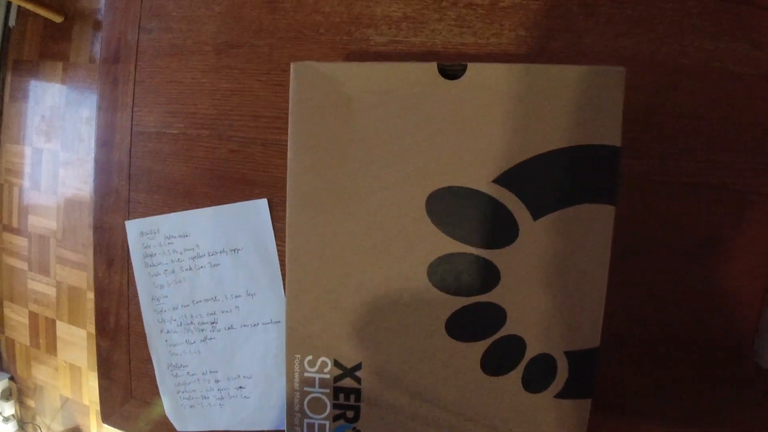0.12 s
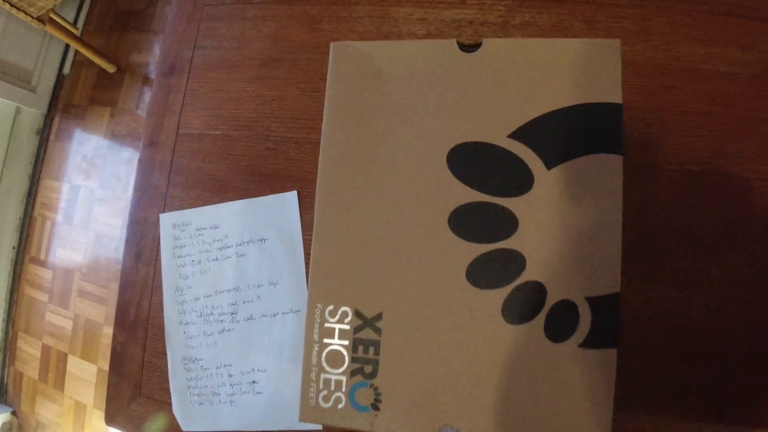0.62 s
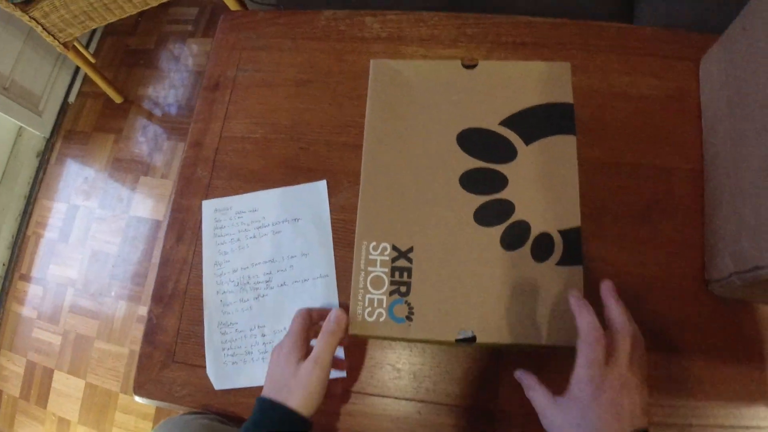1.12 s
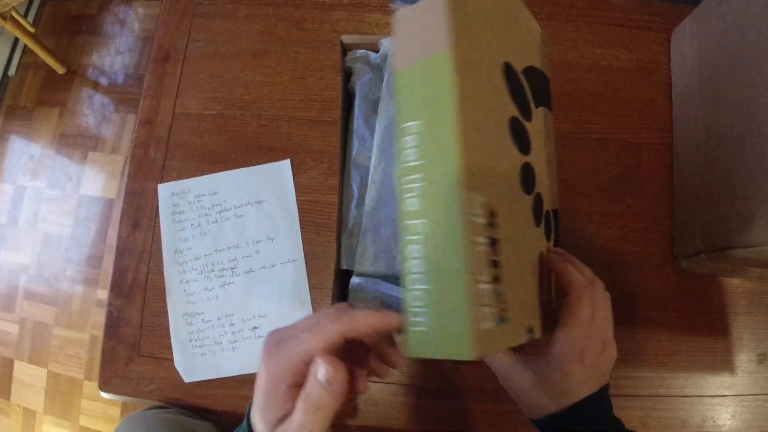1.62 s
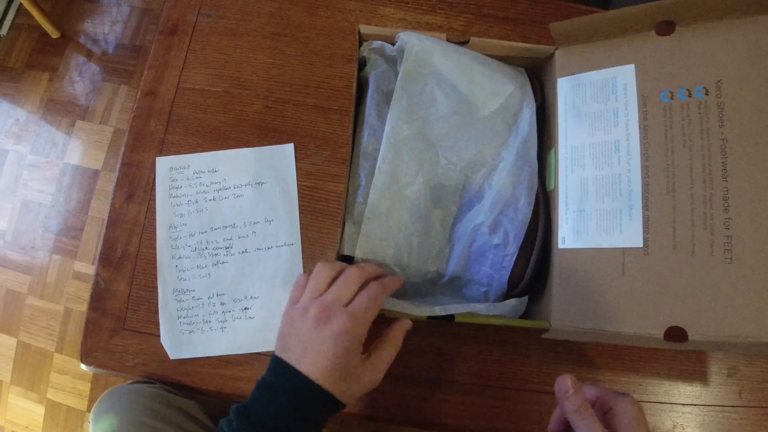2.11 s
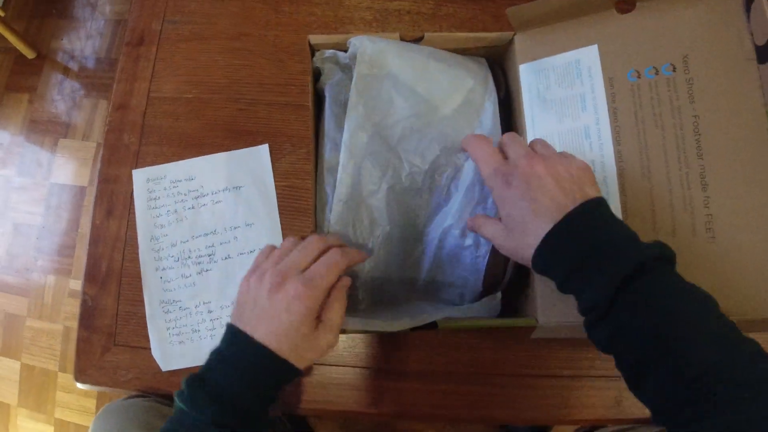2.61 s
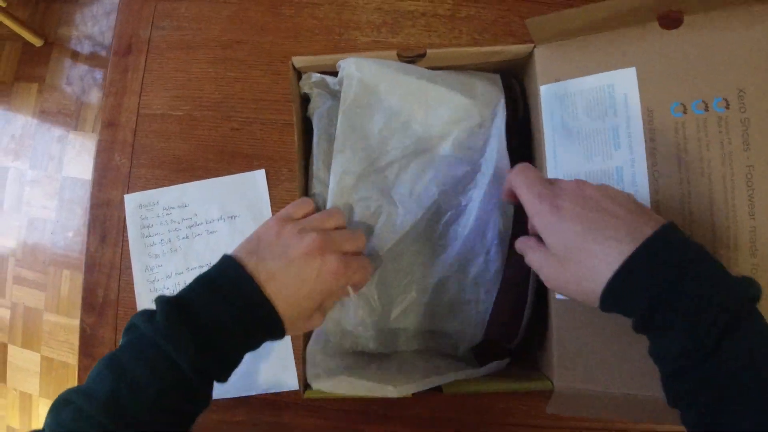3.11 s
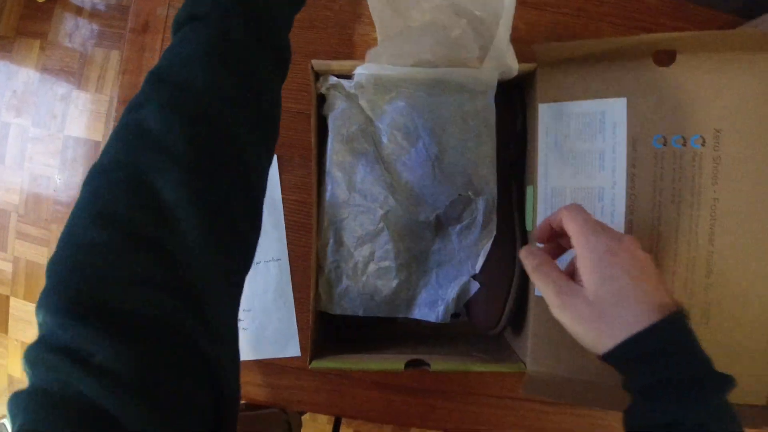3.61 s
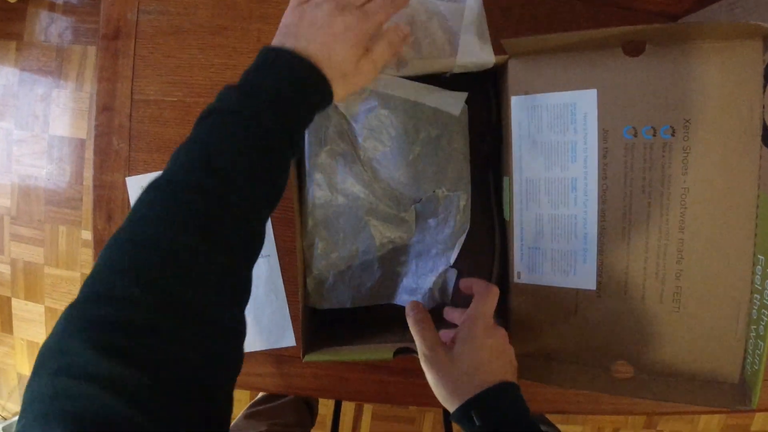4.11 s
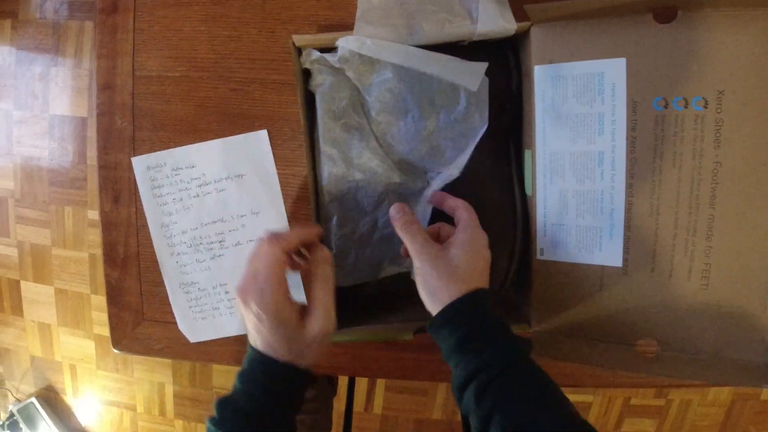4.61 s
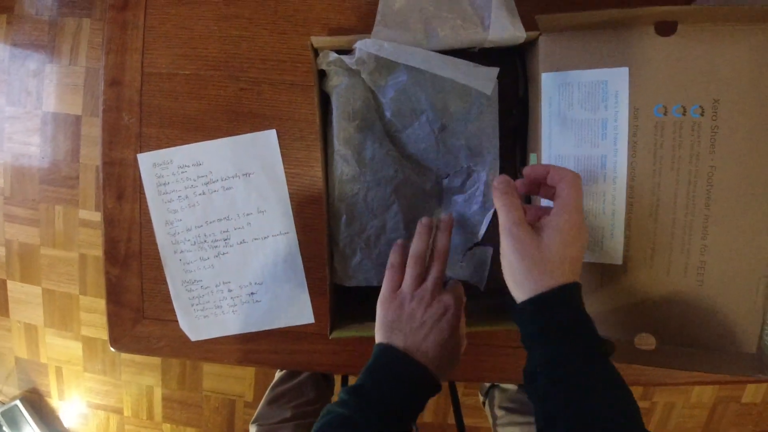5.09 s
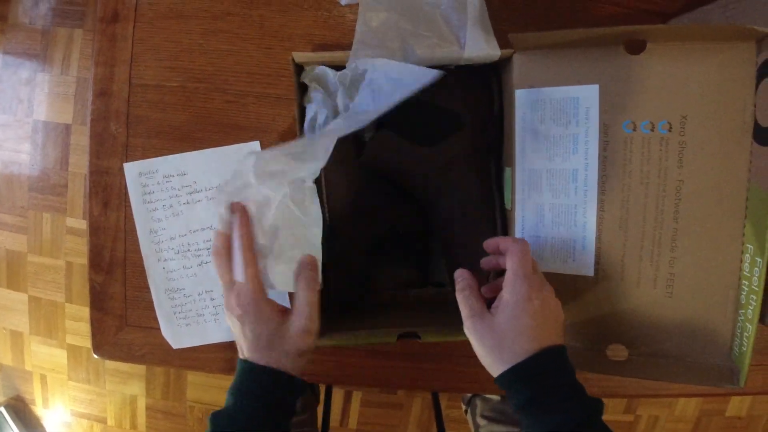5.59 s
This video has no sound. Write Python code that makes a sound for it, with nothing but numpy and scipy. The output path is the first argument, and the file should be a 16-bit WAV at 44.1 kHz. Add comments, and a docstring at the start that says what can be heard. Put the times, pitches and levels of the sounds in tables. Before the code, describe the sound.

A small tap and soft sleeve shuffle, knocks of a cardboard box being opened, then close, bright crinkling of thin wrapping tissue.

```python
"""A quiet room, a small hard tap with a scratchy tail and shuffling sleeves; then a cardboard shoebox on a wooden
table is gripped, its lid pops free, swings over and drops on the table, all as struck modes, rubs and twangs.
Then hands pull back sheets of tissue paper: band noise shaped by grains, with ringing snaps and air pressure dips.
Two close microphone ports hear the bass alike and the treble differently."""
import sys
import numpy as np
from scipy import signal
from scipy.fft import rfft, irfft, next_fast_len
from scipy.io import wavfile

SR = 44100
rng = np.random.default_rng(int(sys.argv[2]) if len(sys.argv) > 2 else 0)


def dump(signal):
    """Clip the signal to [-1, 1] and save it as 16-bit WAV at the path in sys.argv[1]."""
    limited = np.clip(np.atleast_2d(signal).T, -1, 1)
    pcm = np.round(limited * 32767).astype(np.int16)
    wavfile.write(sys.argv[1], SR, pcm)


def natural_amplitude(level_db):
    """Convert a level in decibels to a linear amplitude factor, elementwise."""
    exponent = np.asarray(level_db, float) / 20
    return 10 ** exponent


N = 252249
HZ = np.maximum(np.fft.rfftfreq(next_fast_len(N + SR), 1 / SR), 1)

# Four pulls at the tissue. Each row: time in seconds, crinkle level in dB, sheet flapping level in dB.
TISSUE = [
    [(2.28, -74, -42.5), (2.3, -54.5, -56), (2.322, -65, -52), (2.352, -63.5, -61), (2.384, -56.5, -50),
     (2.46, -57, -50), (2.478, -58.5, -49), (2.64, -65, -60.5), (2.68, -82, -68), (2.686, -83, -83),
     (2.72, -84, -73)],
    [(2.87, -79, -49), (2.888, -60.5, -53), (2.914, -54.5, -54.5), (2.972, -51, -46.5),
     (3.086, -43.5, -45.5), (3.126, -46, -41), (3.162, -49, -53), (3.194, -52, -46), (3.214, -50.5, -48),
     (3.242, -44.5, -44.5), (3.308, -48.5, -46), (3.414, -53.5, -55), (3.424, -51, -48),
     (3.468, -54.5, -45), (3.502, -51, -52), (3.528, -56.5, -47), (3.542, -51, -42.5), (3.624, -42, -45),
     (3.642, -49.5, -46.5), (3.694, -55, -63), (3.71, -50.5, -51), (3.79, -64.5, -72), (3.82, -65.5, -56)],
    [(4.0, -76, -51), (4.03, -44.5, -44), (4.052, -55, -49), (4.066, -48, -45), (4.092, -51, -52),
     (4.12, -49, -42), (4.138, -57, -49), (4.212, -47, -50), (4.288, -56, -48.5), (4.35, -57.5, -53.5),
     (4.454, -56, -53.5), (4.48, -59, -52), (4.524, -50, -59), (4.626, -59.5, -54), (4.704, -49.5, -56),
     (4.72, -48.5, -48), (4.764, -59, -52.5), (4.86, -73, -66.5), (4.88, -77, -69.5)],
    [(5.31, -98, -61.5), (5.34, -63.5, -62.5), (5.374, -50, -51), (5.394, -45.5, -51), (5.408, -53, -57),
     (5.428, -47, -44), (5.44, -45, -48), (5.53, -48, -49.5), (5.578, -47, -41.5), (5.67, -51, -50),
     (5.72, -47, -41.5)],
]
# Tone colour of tissue paper. Each row: frequency in Hz, weight in dB per Hz.
PAPER = [(47, -5), (80, -8.5), (269, -2), (866, -7.5), (1640, -7), (1790, -6), (2440, -8), (3040, -5),
         (3600, -10), (4250, -9), (6160, -11.5), (7190, -21), (8770, -11.5), (11900, -21.5), (13300, -17.5),
         (15600, -20)]


def rms_one(x):
    """Scale to unit rms."""
    return x / np.sqrt(np.mean(x ** 2) + 1e-20)


def in_time(rows):
    """Columns of a dB curve, sample by sample; it fades in from silence over 15 ms."""
    silent_start = [rows[0][0] - .015] + [-100] * (len(rows[0]) - 1)
    s, *columns = np.transpose([silent_start, *rows])
    return [np.interp(np.arange(N) / SR, s, c, left=-150, right=-150) for c in columns]


def strokes(rows, rise_db_per_s, fall_db_per_s):
    """Each stroke rises fast, holds and dies away; strokes add in power. One dB curve per range."""
    t = np.arange(N) / SR
    power = 1e-15
    for s, held, *peak_db in rows:
        rise_loss = rise_db_per_s * np.maximum(s - t, 0)
        fall_loss = np.outer(fall_db_per_s, np.maximum(t - s - held, 0))
        level_db = np.array(peak_db)[:, None] - rise_loss - fall_loss
        power = power + natural_amplitude(2 * np.maximum(level_db, -150))
    return 10 * np.log10(power)


def colour(x, points):
    """Weight the spectrum by (Hz, dB) points."""
    hz, db = np.transpose(points)
    gain = natural_amplitude(np.interp(np.log(HZ), np.log(np.maximum(hz, 1)), db))
    return irfft(rfft(x, 2 * len(HZ) - 2) * gain)[..., :N]


def band(x, low_hz, high_hz):
    """Band-pass with steep sides."""
    return signal.sosfilt(signal.butter(3, [low_hz, high_hz], "band", fs=SR, output="sos"), x)


def ring(clicks, hz, t60):
    """A two-pole resonator: a unit click sets a sine ringing from about height 1."""
    r, w = 1000 ** (-1 / (t60 * SR)), 2 * np.pi * hz / SR
    return signal.lfilter([0, np.sin(w)], [1, -2 * r * np.cos(w), r * r], clicks + 1e-18)


def uneven_sizes(spread_db, shape=N):
    """Sizes of tiny creases: mostly small, now and then far larger."""
    return natural_amplitude(spread_db * np.minimum(rng.exponential(1, shape), 4))


def decaying(sizes, decay_s):
    """Each impulse becomes a sudden start with an exponential decay."""
    return signal.lfilter([1], [1, -np.exp(-1 / (decay_s * SR))], sizes)


def grains(per_s, spread_db, decay_s, bed):
    """Envelope of countless tiny creases: sudden starts, decays, uneven sizes, over a smooth bed."""
    sizes = uneven_sizes(spread_db) * (rng.random(N) < per_s / SR)
    return bed + rms_one(decaying(sizes, decay_s))


def friction(levels_db, spectrum, shared, own_per_s, own_spread_db):
    """Grains excite three ranges of a sheet, low to high; mid and side get unrelated fine detail."""
    out = np.zeros((2, N))
    for level_db, (low, high) in zip(levels_db, [(100, 700), (700, 5500), (5500, 15700)]):
        edges = np.geomspace(low, high, 4)
        layer = 0
        for lower, upper in zip(edges, edges[1:]):
            # each patch of the sheet creases on its own; big patches ring longer
            envelope = shared * grains(own_per_s, own_spread_db, 44.0 / lower, bed=0.56)
            layer = layer + band(rms_one(envelope) * rng.standard_normal((2, N)), lower, upper)
        out += natural_amplitude(level_db) * rms_one(colour(layer, spectrum))
    return out


def pulls():
    """Flap, crinkle and fizz levels of the tissue in dB; in a pull the fizz follows the crinkle."""
    # Tissue settling or merely touched, soft and with little fizz. Each row: start in seconds,
    # hold in seconds, flapping level in dB, crinkle level in dB, fizz level in dB.
    settle = [(2.752, 0.024, -63, -81, -100), (2.787, 0.043, -58, -65.5, -109),
              (3.825, 0.0073, -62, -64, -73), (3.884, 0.012, -54, -61, -99), (3.93, 0.091, -59, -65, -91),
              (4.88, 0.02, -68, -68, -93), (4.95, 0.087, -67, -76, -94), (5.17, 0.0064, -71, -75.5, -91),
              (5.24, 0.06, -71, -73, -105)]
    fizz_db, fizz_per_db, usual_crinkle_db = -46.5, 1.29, -47.5  # harder pulls are brighter
    crinkle_db, flap_db = np.max([in_time(rows) for rows in TISSUE], axis=0)
    pulled = [flap_db, crinkle_db, fizz_db + fizz_per_db * (crinkle_db - usual_crinkle_db)]
    return np.maximum(pulled, strokes(settle, rise_db_per_s=598, fall_db_per_s=[97, 135, 210]))


def pings(per_s, spread_db, cycles):
    """Small taut patches of tissue ring at scattered pitches; the side hears them with random signs."""
    sizes = uneven_sizes(spread_db) * (rng.random(N) < per_s / SR)
    pitches, dealt = np.geomspace(700, 5000, 22), rng.integers(0, 22, N)
    clicks = sizes * np.array([np.ones(N), rng.choice([-1, 1], N)])
    rings = 0
    for k, hz in enumerate(pitches):
        t60 = cycles / hz
        rings = rings + ring(clicks * (dealt == k), hz, t60) / np.sqrt(t60)
    return rms_one(colour(rings, PAPER))


def rasp():
    """Very dense tiny clicks ring in five close resonances; which one leads shifts as the sheet folds."""
    clicks_per_s, middle_hz, cycles = 3000, 3200, 12
    sizes = uneven_sizes(3.0, (2, N)) * rng.choice([-1, 1], (2, N))
    clicks = sizes * (rng.random((2, N)) < clicks_per_s / SR)
    folds = np.interp(np.arange(N), np.linspace(0, N, 150), rng.uniform(-1, 1, 150))
    rings = 0
    for place in np.linspace(-1, 1, 5):
        lead = np.exp(-(folds - place) ** 2 / 0.33)
        rings = rings + ring(clicks * lead, middle_hz * 1.19 ** place, cycles / middle_hz)
    return rms_one(band(rings, 1920, 4600))


def crackles(per_s, spread_db, decay_s):
    """Single creases tick: a sudden spurt of noise, gone in a millisecond or two, in clumps."""
    clumps = np.repeat(rng.exponential(1, N // 800 + 1), 800)[:N]
    sizes = uneven_sizes(spread_db) * (rng.random(N) < clumps * per_s / SR)
    spurts = decaying(sizes, decay_s) * rng.standard_normal((2, N))
    return rms_one(colour(band(spurts, 1500, 14700), PAPER))


def tissue_paper(flap_db, crinkle_db, fizz_db):
    """Pulled tissue: friction in three ranges, with pings and rasp on the crinkle and crackles on the fizz."""
    shared = grains(550, 2.0, 0.041, bed=0.97)
    paper = friction([flap_db, crinkle_db, fizz_db], PAPER, shared, own_per_s=360, own_spread_db=0.93)
    paper = paper + natural_amplitude(crinkle_db + 2.6) * pings(per_s=1000, spread_db=0.45, cycles=110)
    paper = paper + natural_amplitude(crinkle_db + 0.5) * rasp()
    return paper + natural_amplitude(fizz_db + 2) * crackles(per_s=800, spread_db=3.6, decay_s=0.00034)


def lesser(level_db, over_db, middle, count):
    """Chance events under a level curve: (s, level dB, size scattered about a middle)."""
    when, loud, size = rng.random((count, 3)).T
    first_s = TISSUE[0][0][0]
    s = first_s + when * ((N - 1) / SR - first_s)
    events_db = level_db[(s * SR).astype(int)] + over_db - 1.9 * loud
    return list(zip(s, events_db, middle * 2 ** (1.4 * (size - .5))))


def snaps(crinkle_db):
    """A crease gives way: a ragged burst that rings a few cycles at the pitch of its patch."""
    # The loudest creases of card and tissue. Each row: start in seconds, level in dB (the peak lies 5 dB
    # lower), ring pitch in Hz.
    loudest = [(1.5333, -40, 2340), (1.555, -33, 2770), (1.5625, -31, 3860), (1.853, -54, 2860),
               (2.2935, -38.5, 3640), (4.155, -30, 2960), (4.3979, -34, 3320), (4.4987, -37, 3080),
               (4.5745, -30, 2880), (4.9327, -48, 2870), (4.9811, -56, 3100), (5.022, -57, 2000),
               (5.1737, -55, 3250), (5.2385, -52, 3370), (5.26, -52, 3320), (5.3118, -49, 3100),
               (5.3737, -32, 3520), (5.478, -25, 2600), (2.3824, -39, 2980), (2.8836, -38, 3480),
               (2.8946, -47, 3250), (2.9112, -37, 2890), (2.9367, -29.5, 2850), (3.0013, -42, 2780),
               (3.0343, -26.5, 1470), (3.046, -31, 3200), (3.0878, -19, 3540), (3.092, -24, 3520),
               (3.108, -18.5, 3100), (3.1262, -21, 3110), (3.1552, -27.5, 3320), (3.215, -28, 2780),
               (3.234, -24, 3330), (3.238, -24, 1500), (3.3941, -27, 2690), (3.452, -23.5, 2620),
               (3.5622, -29.5, 3180), (3.62, -29, 2860), (3.884, -44, 3200), (3.921, -35, 2170),
               (3.94, -35, 2010), (3.955, -41, 1900), (3.985, -40, 1800), (3.33, -27.5, 1560),
               (3.5387, -34, 2830), (3.6051, -28, 2950), (3.7282, -30, 4580), (3.8642, -37, 3070),
               (4.0201, -27, 3130), (4.062, -28.5, 2830), (4.182, -27.5, 2170), (4.2146, -22.5, 3200),
               (4.4461, -27.5, 3630), (4.6731, -34.5, 3500), (4.7915, -35, 2110), (5.356, -30.5, 3730),
               (5.3925, -25.5, 3340), (5.4404, -20, 3280), (5.5567, -24, 2920), (5.6893, -28, 1180)]
    rows = [*loudest, *lesser(crinkle_db, over_db=17, middle=3100, count=200)]
    rise_s, decay_s = .001, .004
    out, t = np.zeros(N + SR), np.arange(SR // 20) / SR
    for (s, level_db, hz), noise in zip(rows, rng.standard_normal((len(rows), len(t)))):
        burst = noise * (1 - np.exp(-t / rise_s)) * np.exp(-t / decay_s)
        snap = ring(burst, hz, 16 / hz) + band(burst, hz / 3, min(1.24 * hz, 15000))
        out[round(s * SR):][:len(t)] += natural_amplitude(level_db - 5.0) * snap / np.abs(snap).max()
    return out[:N]


def buckles(flap_db):
    """A buckling sheet sucks air: a short dip in pressure between two shallow rises."""
    # The sheet buckling hard. Each row: middle of the dip in seconds, level in dB (the dip is 2 dB deeper),
    # width scale in ms (the dip itself is 1.14 times as wide).
    hardest = [(2.9826, -36, 2.4), (3.1144, -33.5, 3.2), (3.1243, -25.5, 1.8), (3.1361, -29, 1.9),
               (3.1702, -34, 2.2), (3.1963, -32, 2.1), (3.2491, -31, 1.26), (3.2864, -29, 1.3),
               (3.3122, -26, 1.16), (3.3394, -28, 1.37), (3.4559, -34, 2.2), (3.4662, -27.5, 1.35),
               (3.479, -33.5, 2.6), (3.5426, -33, 1.25), (3.5776, -32, 1.03), (3.9005, -38, 3.3),
               (4.0334, -30, 0.53), (4.1304, -37, 0.54), (4.2088, -37.5, 2.1), (4.2469, -33.5, 0.39),
               (5.4458, -36, 0.61), (5.6196, -29.5, 0.44)]
    rows = [*hardest, *lesser(flap_db, over_db=14, middle=0.61, count=50)]
    out, t = np.zeros(N + SR), np.arange(-300, 300) / SR
    for s, level_db, width_ms in rows:
        u = 1000 * t / (0.57 * width_ms)
        dip = (1 - u ** 2) * np.exp(-u ** 2 / 2)
        out[round(s * SR) - 300:][:len(t)] -= natural_amplitude(level_db + 2.0) * dip
    return out[:N]


def blows():
    """A soft push drives the low modes; a longer ragged scuff drives the high ones; one flutter repeat follows."""
    # Blows on the box. Each row: start in seconds, drive in dB of table thud, lid panel, walls and edge crack,
    # contact time in ms.
    hits = [(0.6555, -62, -63, -75, -88, 1.4), (0.668, -79, -53.5, -43.5, -99, 0.76),
            (0.677, -62, -65, -55, -93, 1.1), (0.692, -65, -65, -47, -97, 0.81),
            (0.745, -66, -64, -45, -74, 0.47), (1.2812, -80, -48, -41, -58, 0.34),
            (1.2859, -65, -35, -34.5, -57, 0.46), (1.297, -72, -51.5, -31, -60, 1),
            (1.331, -80, -59, -36.5, -63, 0.71), (1.313, -60, -36, -34, -62, 0.58),
            (1.558, -61, -39, -33, -57, 0.68), (1.5662, -44, -18.5, -22.5, -38, 0.75),
            (1.592, -51, -42, -41, -63, 1.6), (1.943, -83, -59, -47, -53.5, 0.57),
            (2.0347, -46, -41, -27, -52, 0.2), (2.043, -24, -20.5, -19, -66, 0.74),
            (2.057, -27.5, -35, -23, -68, 0.4), (2.067, -53, -30.5, -27, -67, 0.79),
            (2.084, -42, -33, -32, -69, 1), (2.115, -44, -37, -31.5, -46.5, 0.96),
            (2.2465, -54, -35, -40, -60.5, 0.88), (2.253, -30, -40, -40, -71, 1.3),
            (2.293, -40, -42.5, -39, -59, 0.57), (3.877, -71, -48, -49, -72, 1),
            (3.882, -50, -39.5, -57, -52, 0.74), (3.893, -57, -39.5, -43, -52, 0.59),
            (3.908, -62, -51, -52, -57, 0.77), (3.946, -68, -41, -51, -48.5, 1)]
    # Modes of box and table, before a shared lift and a cap on the ring. Each row: frequency in Hz,
    # relative level in dB, t60 in seconds.
    modes = [(48, -8, 0.37), (81, 0, 0.097), (114, 2.5, 0.059), (163.5, -2, 0.22), (184, 5, 0.026),
             (246, 9.5, 0.05), (309, 1.5, 0.12), (350, -5.5, .07), (430, -6, 0.1), (520, 1, 0.1),
             (554, -2.5, 0.1), (715, 0.5, 0.1), (793, -1, 0.05), (883, -1.5, 0.04), (1180, 7.5, 0.044),
             (1370, 4.5, 0.089), (1564, 5, 0.079), (1807, 5, 0.02), (2250, -2, 0.09), (2890, 0, 0.085),
             (3130, -17, 0.022), (3870, -42, 0.022)]
    t, out = np.arange(SR // 20) / SR, np.zeros(N)
    pushes = np.zeros((5, N + SR))  # thud, lid, walls, edge, and the edge scuff heard directly
    for (s, *parts_db, contact_ms), noise in zip(hits, rng.standard_normal((len(hits), len(t)))):
        start = round(s * SR)
        push = t * np.exp(-1000 * t / contact_ms)
        push = push / push.sum()
        swell = t * np.exp(-1000 * t / (6 * contact_ms))
        scuff = swell * noise / np.linalg.norm(swell)
        shapes = [push, push, push + .25 * scuff, scuff]
        pushes[:4, start:][:, :len(t)] += natural_amplitude(np.array(parts_db))[:, None] * shapes
        pushes[4, start:][:len(t)] += natural_amplitude(parts_db[3] + 8.5) * swell * noise / swell.max()
    for k, (hz, level_db, t60) in enumerate(modes):
        part = np.searchsorted([130, 330, 1000], hz)
        if hz > 170:
            t60 = min(t60, 14 / hz + 0.012)  # cardboard damps strongly: a few dozen cycles at most
        # neighbouring panel modes start in opposition, so the knock swells
        sign = (-1) ** k if part else -1
        out += natural_amplitude(level_db + 2.5) * sign * ring(pushes[part, :N], hz, t60)
    knocks = out + band(pushes[4, :N], 700, 3200)
    # the sound bounces between table and ceiling and returns once, 24.5 ms late
    return knocks + natural_amplitude(-16) * np.roll(knocks, round(.0245 * SR))


def twangs():
    """A taut patch rings on one clean pitch: a sine that swells over about two cycles and dies away."""
    # Each row: start in seconds, level in dB ahead of swell and decay, pitch in Hz, t60 in seconds.
    patches = [(2.2458, -19, 398, .04), (2.0352, -14.5, 482, 0.036), (2.035, -27.5, 1310, 0.018),
               (2.05, -35, 1200, .03), (1.5665, -24.5, 1840, 0.035), (2.111, -35, 1650, .03),
               (2.121, -41, 1665, 0.078), (3.4229, -22, 1792, 0.023), (3.428, -23.5, 1814, 0.022),
               (5.2994, -51, 4230, .02)]
    out, t = np.zeros(N + SR), np.arange(SR // 10) / SR
    for s, level_db, hz, t60 in patches:
        envelope = (1 - np.exp(-t * hz / 2)) * 1000 ** (-t / t60)
        out[round(s * SR):][:len(t)] += natural_amplitude(level_db) * envelope * np.sin(2 * np.pi * hz * t)
    return out[:N]


def rubbing():
    """Fingers and lid rub on cardboard: friction whose grains sit on a strong smooth bed."""
    # One stroke each. Each row: start in seconds, hold in seconds, dull drag level in dB, scratch level in dB,
    # fine grit level in dB.
    rubs = [(1.288, 0.023, -49.5, -65.5, -105), (1.45, 0.066, -61.5, -69, -99),
            (1.522, .01, -53.5, -57.5, -66), (1.535, 0.04, -59, -50.5, -56),
            (1.572, 0.083, -47, -57.5, -67.5), (1.852, 0.0073, -76, -87, -100),
            (1.944, 0.0038, -52, -58, -77), (2.038, 0.004, -59, -47.5, -51.5),
            (2.116, 0.0039, -40, -68, -64.5), (2.248, 0.0054, -42.5, -59.5, -96)]
    # Tone colour of cardboard. Each row: frequency in Hz, weight in dB per Hz.
    card = [(47, -37), (80, 0), (181, 0), (1030, -17.5), (2390, -22.5), (4420, -27), (5280, -31.5),
            (6300, -39), (7190, -38), (10700, -40), (15600, -56)]
    levels_db = strokes(rubs, rise_db_per_s=2992, fall_db_per_s=[128, 101, 222])
    return friction(levels_db, card, grains(250, 0.73, 0.05, bed=5.2), own_per_s=190, own_spread_db=0.8)


def tick():
    """A small hard tap: a short burst of noise through a few broad resonances."""
    # In order: start in seconds, peak level in dB, decay in seconds.
    tap = (.554, -31, .0024)
    # Resonances of the tap. Each row: frequency in Hz, level in dB, t60 in seconds.
    resonances = [(500, -16, .008), (800, -12, .004), (1050, -1, .008), (1600, -4, .006), (2150, -4, .005),
                  (3000, -6, .004), (3900, -9, .003)]
    s, peak_db, decay_s = tap
    t = np.maximum(np.arange(N) / SR - s, 0)
    burst = rng.standard_normal(N) * t * np.exp(-t / decay_s)
    rings = sum(natural_amplitude(db) * ring(burst, hz, t60) for hz, db, t60 in resonances)
    rings = band(band(rings, 350, 4200), 300, 4600)
    return natural_amplitude(peak_db) * rings / np.abs(rings).max()


def tap_tail_and_sleeves():
    """Soft scratchy noise with sparse grains: first the dying tail of the tap, then sleeves shuffling."""
    # The first row is the tail of the tap, the others are sleeves. Each row: start in seconds,
    # hold in seconds, dull level in dB, scratchy level in dB.
    scratches = [(.561, .004, -68, -58), (.617, .008, -64, -76), (.652, .005, -70, -79),
                 (.669, .03, -66, -70), (.722, .006, -65, -77), (.746, .02, -64, -77), (.85, .08, -72, -71),
                 (1.0, .25, -82, -84)]
    dull_db, scratch_db = strokes(scratches, rise_db_per_s=2500, fall_db_per_s=[209, 230])
    noise = grains(80, 3.0, 0.01, bed=1.0) * rng.standard_normal((2, N))
    dull = natural_amplitude(dull_db) * rms_one(band(noise[0], 110, 650))
    return dull + natural_amplitude(scratch_db) * rms_one(band(noise[1], 900, 3500))


def room(x):
    """Two unrelated dying tails of reflections, duller than the direct sound."""
    t60_s, dull_hz = .28, 3500
    t = np.arange(SR * 3 // 4) / SR
    tails = rng.standard_normal((2, len(t))) * 1000 ** (-t / t60_s) * (t > .003)
    tails = signal.sosfilt(signal.butter(1, [280, dull_hz], "band", fs=SR, output="sos"), tails)
    tails = tails / np.linalg.norm(tails, axis=1, keepdims=True)
    return signal.fftconvolve(x[None], tails, axes=1)[:, :N]


def shaken_table():
    """Table and air shaken by the hands: deep noise that follows a level curve."""
    # Each row: time in seconds, level in dB.
    shaking = [(0.0, -70), (0.59, -69.5), (1.02, -75), (1.55, -70), (2.03, -72), (2.06, -46), (2.18, -45),
               (2.37, -56), (2.64, -71), (3.06, -54), (3.55, -66), (3.9, -71), (4.06, -55), (4.38, -60),
               (4.89, -66), (5.24, -66.5), (5.72, -59)]
    return natural_amplitude(in_time(shaking)[0]) * rms_one(band(rng.standard_normal(N), 3.4, 92))


def quiet_room():
    """Steady coloured noise, unrelated in mid and side."""
    # Tone colour of the quiet room. Each row: frequency in Hz, weight in dB per Hz.
    hush = [(15, -39), (25, -9), (81, -10), (117, -5), (231, -27), (308, -21), (1170, -25), (1440, -29),
            (5200, -35), (6940, -43), (9000, -47), (13000, -52), (16000, -58)]
    return natural_amplitude(-71) * rms_one(colour(rng.standard_normal((2, N)), hush))


def two_ports(mid, unlike):
    """Side signal of two spaced ports: part is the mid a quarter cycle late, the rest is unrelated sound."""
    # Weight of the side. Each row: frequency in Hz, side minus mid in dB.
    side_share = [(60, -20), (110, -15.5), (200, -28.5), (380, -20), (700, -18), (1290, -10), (2380, -8.5),
                  (4400, -0.5), (8120, -1.5), (15000, -1)]
    lag_share = .45
    lagging = signal.hilbert(mid).imag
    return colour(lag_share * lagging + np.sqrt(1 - lag_share ** 2) * unlike, side_share)


def scene():
    """Mid and side of everything, then left and right."""
    flap_db, crinkle_db, fizz_db = pulls()
    tissue = tissue_paper(flap_db, crinkle_db, fizz_db)
    rub = rubbing()
    hush = quiet_room()
    rumble = shaken_table()
    hits = blows() + tick() + twangs() + snaps(crinkle_db) + buckles(flap_db) + tap_tail_and_sleeves()
    echo = natural_amplitude(-14) * room(hits)
    mid = hits + echo[0] + tissue[0] + rub[0] + hush[0]
    unlike = 2.3 * echo[1] + tissue[1] + rub[1] + hush[1]
    side = two_ports(mid, unlike)
    return np.array([mid + rumble + side, mid + rumble - side])


def roll_off(x):
    """The treble ends steeply here."""
    return signal.sosfilt(signal.butter(12, 15700, fs=SR, output="sos"), x)


def record(dry):
    """The microphone drops the deepest bass."""
    heard = signal.sosfilt(signal.butter(1, 12.0, "high", fs=SR, output="sos"), dry)
    return roll_off(heard)


dry = scene()
out = record(dry)
dump(out)
```